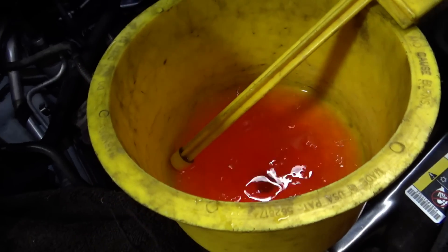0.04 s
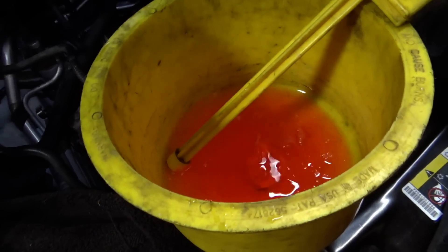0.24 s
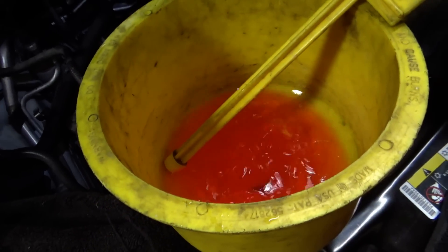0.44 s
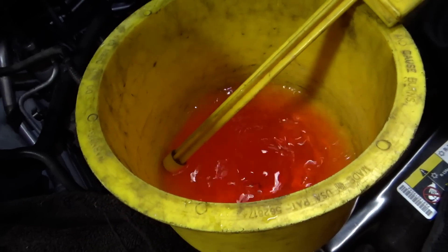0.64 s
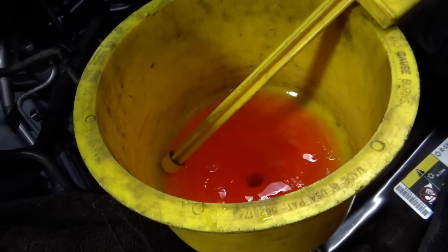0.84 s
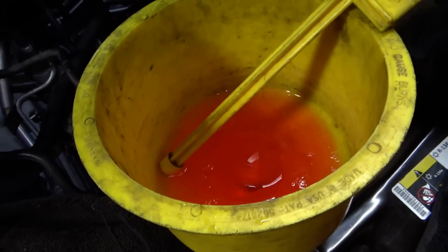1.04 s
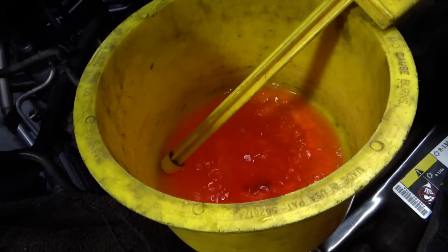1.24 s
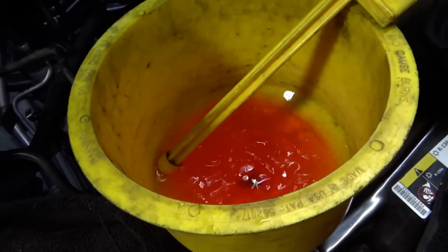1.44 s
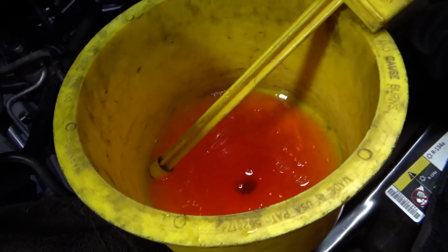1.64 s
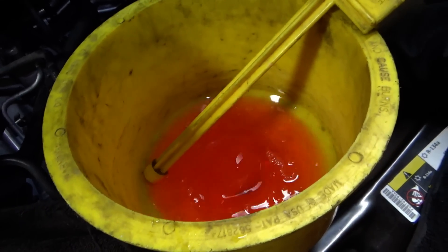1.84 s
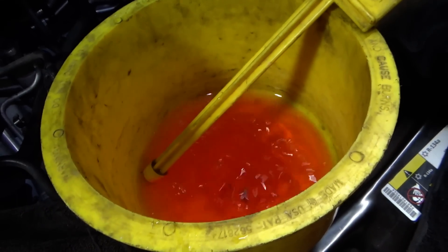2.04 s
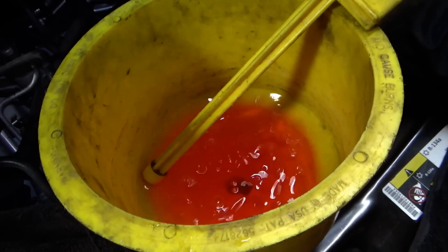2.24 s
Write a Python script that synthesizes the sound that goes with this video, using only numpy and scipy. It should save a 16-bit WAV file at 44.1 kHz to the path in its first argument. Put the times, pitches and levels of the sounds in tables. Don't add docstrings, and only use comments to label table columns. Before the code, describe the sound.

Bubbling glugs of coolant in a plastic funnel, popping and ticking in bursts over faint hiss

```python
import sys
import numpy as np
from scipy import signal
from scipy.fft import rfft, irfft, next_fast_len
from scipy.io import wavfile

SR = 44100
rng = np.random.default_rng(int(sys.argv[2]) if len(sys.argv) > 2 else 0)


def how_loud(loudness_db):
    steps = np.asarray(loudness_db, float) / 20
    return 10 ** steps


def inscribe(sig):
    pcm = np.round(np.clip(np.atleast_2d(sig).T, -1, 1) * 32767)
    wavfile.write(sys.argv[1], SR, pcm.astype(np.int16))


N = 100856


def rms_one(x):
    return x / np.sqrt(np.mean(x ** 2) + 1e-20)


def at_hz(points, hz):
    table_hz, value = np.array(points).T
    return np.interp(np.log(hz), np.log(table_hz), value)


def drift(rate_hz):
    step = 40
    r = np.exp(-2 * np.pi * rate_hz * step / SR)
    slow = signal.lfilter([1], [1, -2 * r, r * r], rng.standard_normal(N // step + 2002))
    slow = rms_one(slow[2000:])
    return np.interp(np.arange(N) / step, np.arange(len(slow)), slow)


def add(out, start_s, sound, side):
    spread_db = 0.9
    i = int(start_s * SR)
    sound = sound[:N - i]
    out[:, i:i + len(sound)] += how_loud(spread_db * side * np.array([[0.5], [-0.5]])) * sound


def air_pockets(rows, envelope):
    climb_curve, wobble_db = 0.732, 1
    out = np.zeros((2, N))
    wobble = how_loud(wobble_db * drift(135))
    sides = rng.standard_normal(len(rows))
    for (start_s, length_s, start_hz, end_hz, db), side in zip(rows, sides):
        u = np.arange(int(length_s * SR)) / (length_s * SR)
        pitch_hz = start_hz * (end_hz / start_hz) ** (u ** climb_curve)
        ring = np.sin(2 * np.pi * np.cumsum(pitch_hz) / SR)
        add(out, start_s, how_loud(db) * envelope(u, length_s) * ring, side)
    return out * wobble


# start in seconds, length in seconds, start pitch in Hz, end pitch in Hz, level in dB.
BIG_POCKETS = [(.278, 0.072, 191, 545, -30), (.325, 0.047, 197.6, 433, -27.5),
               (.362, 0.052, 403.5, 640, -20), (.405, 0.036, 594, 850, -32.5),
               (.362, 0.036, 600, 974, -28.5), (.46, 0.0363, 427, 548, -37.5), (.49, 0.059, 560, 1180, -50),
               (1.108, 0.02, 248, 413, -39.5), (1.142, 0.019, 273, 396, -51),
               (1.322, 0.039, 1263, 2070, -28), (1.32, 0.04, 1510, 3910, -36),
               (2.008, .055, 920, 1660, -42), (2.066, 0.023, 1776, 2960, -30),
               (2.078, 0.022, 1224, 2130, -35.5), (2.19, 0.036, 1385, 2100, -45.5),
               (2.228, 0.013, 1890, 2980, -62), (.35, 0.025, 836, 1636, -14.5),
               (1.985, 0.021, 1312, 1454, -33.5)]


def glugs():
    peak_share, sharpness = 0.59, 0.8

    def swell(u, length_s):
        return np.minimum(u / peak_share, (1 - u) / (1 - peak_share)) ** sharpness

    return air_pockets(BIG_POCKETS, swell)


# start in seconds, length in seconds, start pitch in Hz, end pitch in Hz, level in dB.
PINCHED_BUBBLES = [(.263, 0.0098, 526, 587, -37), (.339, 0.034, 560, 1047, -14),
                   (.465, 0.0085, 1850, 2900, -20.5), (.489, 0.012, 2853, 3292, -11),
                   (.511, 0.013, 2610, 3150, -33), (.556, 0.015, 2390, 3100, -34.5),
                   (.586, .008, 2200, 3000, -35), (.757, 0.024, 627, 690, -35),
                   (1.16, 0.057, 560, 1563, -16.5), (1.165, 0.034, 398, 580, -39.5),
                   (1.209, 0.017, 577, 850, -42), (1.248, 0.036, 1220, 1420, -39),
                   (1.277, 0.051, 970, 1160, -38), (1.358, 0.031, 1697, 3135, -24),
                   (1.353, 0.012, 3320, 4350, -24.5), (1.399, 0.02, 1060, 1100, -31),
                   (1.42, 0.0233, 1566, 2440, -28.5), (1.513, 0.025, 496, 526, -40),
                   (1.811, 0.045, 520, 564, -41), (1.978, 0.034, 1030, 1310, -30.5),
                   (2.134, 0.0217, 2306, 1520, -33), (2.15, 0.02, 934, 1550, -25),
                   (2.17, 0.005, 3080, 3800, -32), (2.184, 0.021, 3540, 3740, -33)]


def plops():
    rise_s, loss_db = 0.001, 16

    def pluck(u, length_s):
        rise = np.minimum(u * length_s / rise_s, 1)
        return rise * how_loud(-loss_db * u) * np.minimum(10 * (1 - u), 1)

    return air_pockets(PINCHED_BUBBLES, pluck)


def pops(rows, cycles, snap_db, spray_db, spray_t60_s, spread):
    snap_t60_s, rise_s = 0.004, 0.0012
    out = np.zeros((2, N))
    t = np.arange(2500) / SR
    noises = rng.standard_normal((len(rows), len(t)))
    rise = np.minimum(t / rise_s, 1)
    puff = how_loud(snap_db - 60 * t / snap_t60_s) + how_loud(spray_db - 60 * t / spray_t60_s)
    for (start_s, db, hz), noise in zip(rows, noises):
        edges_hz = [hz / spread, min(hz * spread, 0.45 * SR)]
        band = signal.butter(1, edges_hz, "band", fs=SR, output="sos")
        ring = np.sin(2 * np.pi * hz * t * (1 + 1.03 * t)) * how_loud(-60 * t * hz / cycles)
        spray = signal.sosfilt(band, noise * puff)
        add(out, start_s, how_loud(db - 3) * rise * (ring + spray), noise[-1])
    return out


# start in seconds, peak in dB, ring pitch in Hz.
BURSTS = [(0.0113, -36, 2300), (0.0347, -43, 1570), (0.2476, -21, 2550), (0.2644, -25, 2430),
          (0.308, -14.5, 1304), (0.3093, -10, 2350), (0.3471, -14, 1420), (0.4196, -19, 3840),
          (0.4883, -5.5, 2710), (0.5197, -27.5, 1360), (0.6065, -22, 3280), (0.7173, -38.5, 1510),
          (0.7318, -31.5, 1376), (0.7804, -30.5, 2830), (0.8285, -37, 1890), (0.895, -42.5, 1464),
          (1.02, -35, 2380), (1.064, -33, 2220), (1.0818, -27, 3090), (1.1124, -22.5, 1466),
          (1.1324, -22.5, 2360), (1.1586, -11.5, 2340), (1.1814, -26, 1380), (1.2785, -26.5, 1510),
          (1.4777, -35.5, 1500), (1.4998, -26.5, 1520),
          (1.8808, -23.5, 1770),
    (1.9004, -25, 2350),
    (1.9134, -26, 1820),
    (1.953, -17, 3070),
    (2.0348, -26, 2830),
    (2.0522, -26, 1590),
    (2.1021, -21.5, 3850),
    (2.1445, -22, 1800),
    (2.1774, -22.5, 1530),
]


def surface_bursts():
    return pops(BURSTS, cycles=44, snap_db=-8.5,
                spray_db=-4, spray_t60_s=0.077, spread=1.18)


# start in seconds, peak in dB, ring pitch in Hz.
TICKS = [(0.196, -19.5, 10400), (0.2453, -24, 7170), (0.3112, -8.5, 8600), (0.403, -17.5, 4900),
         (0.4267, -18, 7600), (0.466, -23.5, 5200), (0.5126, -16.5, 4600), (0.5405, -21.5, 4750),
         (0.5571, -21, 5630), (0.607, -9.5, 6070), (0.6928, -19.5, 6500), (0.7794, -18, 9460),
         (0.9066, -21, 10000), (1.1314, -28, 4900), (1.1864, -28, 9300), (1.228, -16, 10300),
         (1.2456, -16, 9800),
         (1.307, -21, 4750), (1.3176, -10.5, 8300), (1.3415, -0.5, 6300), (1.3658, -2.5, 5980),
               (1.388, -24, 6400), (1.398, -18, 7700), (1.4256, -13.5, 5300), (1.497, -13.5, 8560),
               (1.547, -28.5, 5550), (1.7385, -35, 4700), (2.0516, -25.5, 9600), (2.069, -16, 9000),
               (2.0874, -18.5, 5090), (2.0943, -6.5, 8350), (2.1184, -17.5, 4900), (2.1573, -11, 9800),
               (2.182, -23, 9600), (2.2586, -22.5, 9900)]


def droplet_ticks():
    return pops(TICKS, cycles=64, snap_db=-11.5,
                spray_db=-11, spray_t60_s=0.034, spread=1.94)


# start in seconds, length in seconds, level in dB.
SURGES = [(-.04, .1, -46.5), (0.234, 0.051, -39), (0.289, .14, -28.5), (0.412, .14, -38),
          (0.689, 0.097, -45), (1.058, 0.11, -37), (1.159, 0.12, -38.5), (1.273, 0.15, -38.5),
          (1.464, 0.108, -45), (1.869, 0.056, -37.5), (1.925, 0.082, -47), (2.02, 0.1, -42.5),
          (2.128, 0.092, -40)]


def churning():
    calm_db, edge_s = -60, 0.014
    t = np.arange(N) / SR
    power = how_loud(2 * calm_db)
    for start_s, length_s, db in SURGES:
        to_edge_s = np.minimum(t - start_s, start_s + length_s - t)
        power = power + how_loud(2 * db) * np.clip(to_edge_s / edge_s, 0, 1) ** 2
    return np.sqrt(power)


def fizz():
    per_s, low_hz, high_hz = 630, 502.4, 12060
    ring_cycles, most_climb = 18.7, 0.01194
    size_db, tilt_db = 4.0, 1.5
    out = np.zeros((2, N))
    churn = churning()
    draws = rng.random((3000, 5))
    times = np.cumsum(-np.log(draws[:, 0] + 1e-9) / per_s)
    times = times[times < (N - 1) / SR]
    for start_s, (_, pitch, size, climb, side) in zip(times, draws):
        hz = low_hz * (high_hz / low_hz) ** pitch
        cycle = np.arange(int(ring_cycles * SR / hz)) * hz / SR
        db = tilt_db * np.log2(hz / 2000) - size_db * np.log(size + 0.0062)
        shape = np.minimum(cycle / 1.57, 1) * how_loud(db - 40 * cycle / ring_cycles)
        ring = np.sin(2 * np.pi * cycle * (1 + most_climb * climb * cycle))
        add(out, start_s, churn[int(start_s * SR)] * shape * ring, 3 * side - 1.5)
    return out


# pitch in Hz, width in Hz, level in dB.
AIR_COLUMN = [(560, 30, -7), (1420, 70, 3.5), (2360, 304, -1), (2742, 264, -2.5), (3196, 280, -2.5),
              (4030, 450, 2.5)]


def funnel(x):
    out = x.copy()
    for hz, width_hz, db in AIR_COLUMN:
        r = np.exp(-np.pi * width_hz / SR)
        feed = (1 - r * r) / 2 * np.array([1, 0, -1])
        ring = [1, -2 * r * np.cos(2 * np.pi * hz / SR), r * r]
        out += how_loud(db) * signal.lfilter(feed, ring, x + 1e-18)
    return out


def nearby_echoes(x):
    level_db, t60_s = -23.5, 0.19
    size = next_fast_len(N + SR)
    w = 2 * np.pi * np.arange(size // 2 + 1) / size
    spectrum = rfft(x.mean(axis=0), size)
    lags = rng.uniform(0.002, 0.014, (2, 6)) * SR
    loops = np.zeros((2, len(w)), complex)
    for loop, row in zip(loops, lags):
        for lag in row:
            bounce = how_loud(-60 * lag / SR / t60_s) * np.exp(-1j * w * lag)
            loop += 1 / (1 - bounce) - 1
    return how_loud(level_db) * irfft(spectrum * loops, size)[:, :N]


# pitch in Hz, level in dB per Hz.
HISS_COLOUR = [(24, -71), (40, -39), (222, -12.5), (776, -0.5), (1150, -7), (9230, -10.5), (14000, -22.5)]
# pitch in Hz, likeness as a share (1 = the same).
HISS_LIKENESS = [(100, 1), (1000, 0.51), (10000, 0.75)]


def room_hiss():
    level_db, swell_db, flicker_db = -54.5, 3.5, 0.8
    out = 0
    edges = 30 * 2 ** np.arange(0, 9.6, 0.5)
    white = rng.standard_normal((2, 2, N))
    for k, (low, high) in enumerate(zip(edges, edges[1:])):
        band = signal.butter(2, [low, high], "band", fs=SR, output="sos")
        mid, side = signal.sosfilt(band, white[k % 2])
        hz = np.sqrt(low * high)
        alike = np.clip(at_hz(HISS_LIKENESS, hz), -1, 1)
        gain = how_loud(at_hz(HISS_COLOUR, hz) + flicker_db * drift(7.7))
        out = out + gain * (np.sqrt(1 + alike) * mid + np.sqrt(1 - alike) * side * [[1], [-1]])
    return how_loud(level_db + swell_db * np.arange(N) / N) * rms_one(out)


def scene():
    liquid = glugs() + plops() + surface_bursts() + droplet_ticks() + fizz()
    near = funnel(liquid)
    return near + nearby_echoes(near) + room_hiss()


def band_limit(x):
    return signal.sosfilt(signal.butter(12, 15560, fs=SR, output="sos"), x)


def record(dry):
    bass_cut = signal.butter(2, 98, "high", fs=SR, output="sos")
    top_cut = signal.cheby2(6, 24, 14300, fs=SR, output="sos")
    mix = signal.sosfilt(top_cut, signal.sosfilt(bass_cut, dry))
    return band_limit(mix)


dry = scene()
out = record(dry)
inscribe(out)
```